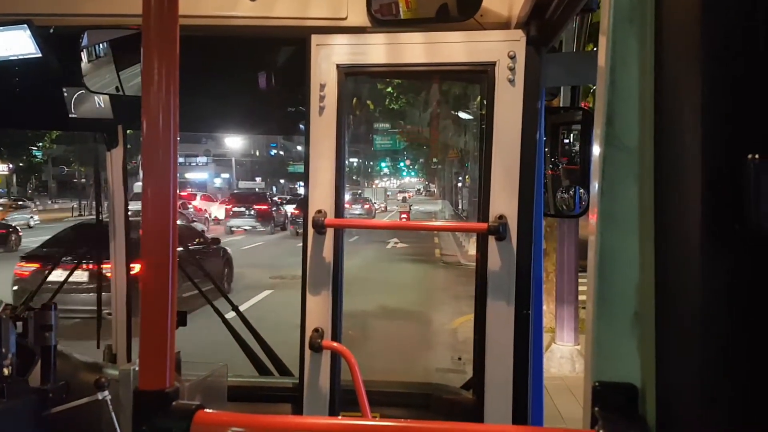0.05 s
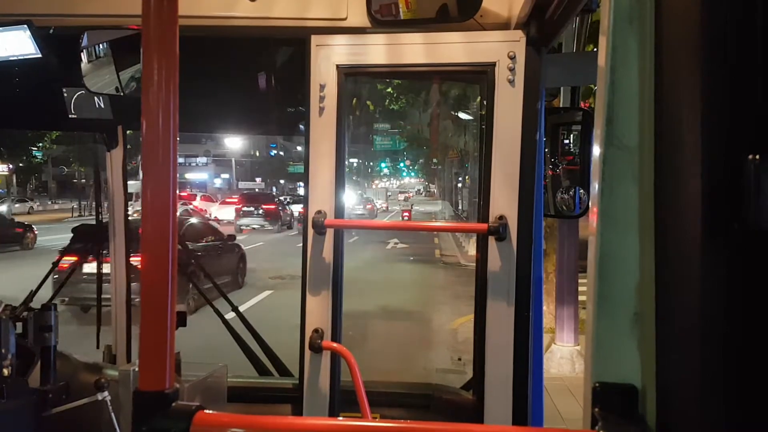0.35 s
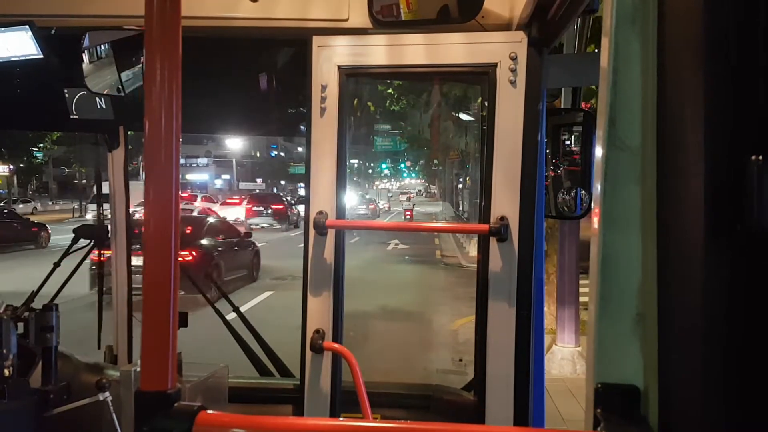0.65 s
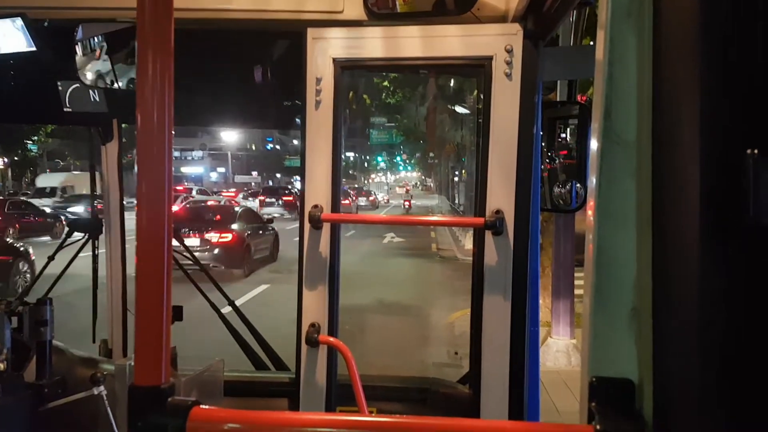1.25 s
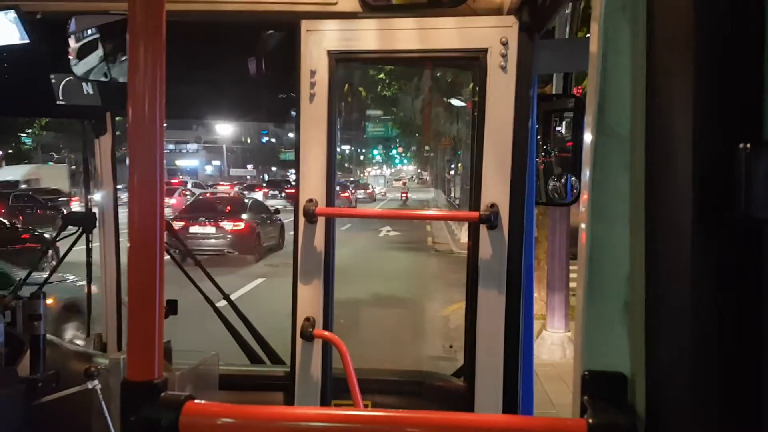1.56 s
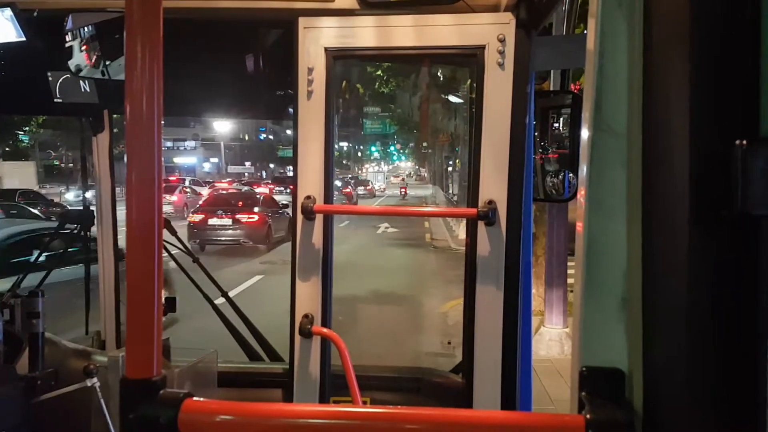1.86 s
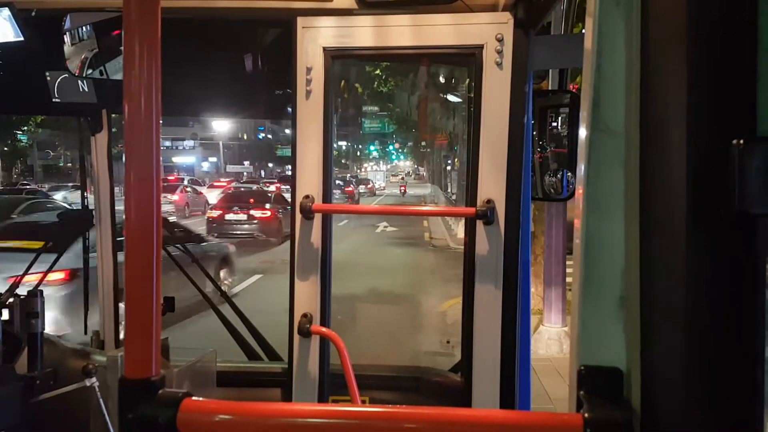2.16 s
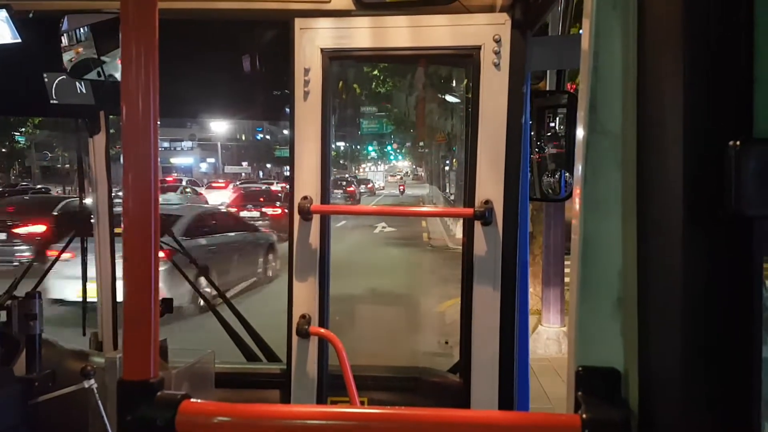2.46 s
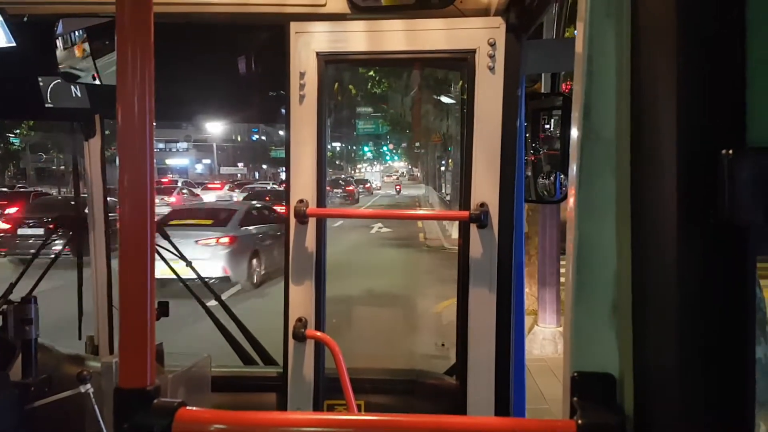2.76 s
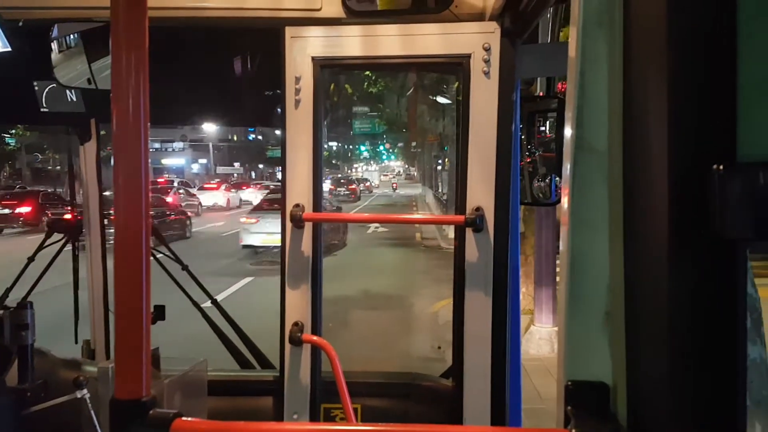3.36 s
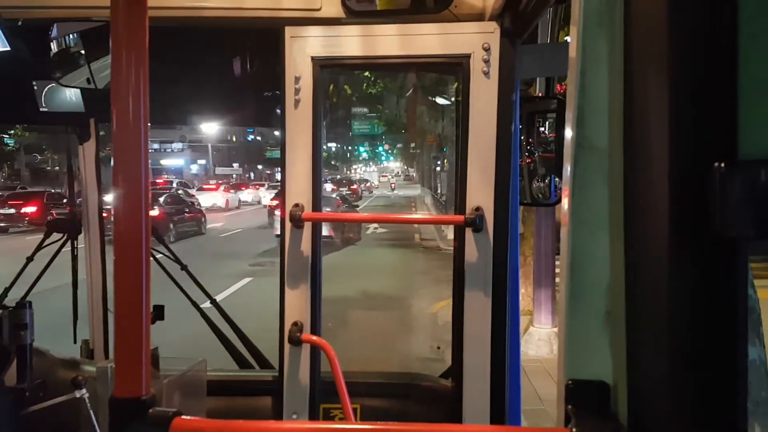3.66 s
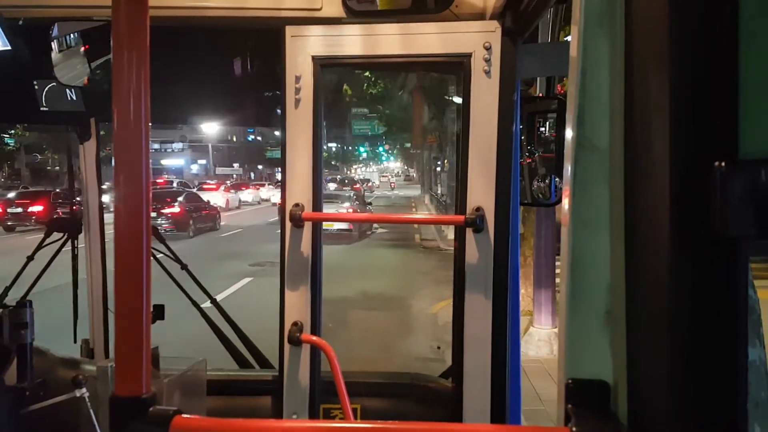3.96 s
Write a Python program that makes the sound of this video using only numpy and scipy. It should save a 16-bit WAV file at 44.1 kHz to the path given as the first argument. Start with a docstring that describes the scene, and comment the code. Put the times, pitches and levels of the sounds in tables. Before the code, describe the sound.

A pneumatic bus door hisses, rumbles along its track and thuds shut.

```python
"""Bus door closing at night

Inside a city bus in traffic, a pneumatic door closes. Air hisses and whistles out of its valve,
the leaf rumbles along its track, shakes the body panels and thuds shut, and small puffs and
squeaks of air follow. Under it all the cabin hums and rumbles, and the engine begins to pull."""
import sys
import numpy as np
from scipy import signal
from scipy.fft import rfft, irfft, next_fast_len
from scipy.io import wavfile
from scipy.ndimage import map_coordinates

SR = 44100
rng = np.random.default_rng(int(sys.argv[2]) if len(sys.argv) > 2 else 0)


def materialize(psi):
    """Save the field psi as 16-bit PCM at rate SR to the path in sys.argv[1].

    A 1-D psi becomes a single channel; in a 2-D psi each row is a channel.
    """
    bounded = np.clip(np.atleast_2d(psi).T, -1, 1)
    quanta = np.round(bounded * 32767).astype(np.int16)
    wavfile.write(sys.argv[1], SR, quanta)


N = 176400

# dull knock of a body panel: freq_hz, level_db
PANEL_COLOUR = [(60, -35), (130, 3), (175, 4), (270, 1), (350, -3), (500, -10.5), (800, -14), (1500, -33),
                (4000, -50)]
# bright rattle of the fittings: freq_hz, level_db
RATTLE_COLOUR = [(250, -16), (480, 4), (950, 6.5), (1400, 4.5), (1900, 1.5), (2600, -12.5), (3600, -12.5),
                 (6000, -17), (14000, -36)]


def amp(db):
    """Decibels to gain."""
    return 10 ** (np.asarray(db) / 20)


def unit(x):
    """Scale to rms 1."""
    return x / np.sqrt(np.mean(np.abs(x) ** 2) + 1e-20)


def along(points, hz):
    """Read (freq_hz, value) points on a log frequency axis."""
    freqs, values = np.transpose(points)
    return np.interp(np.log(hz + 1), np.log(freqs + 1), values)


def clock():
    """Time of each sample in seconds."""
    return np.arange(N) / SR


def curves(rows):
    """One automation curve for each column after the time."""
    times, *columns = np.transpose(rows)
    return [np.interp(clock(), times, column) for column in columns]


def wobble(rate):
    """A smooth random curve, rate knots a second."""
    t = clock()
    coarse = t[::8]
    knots = rng.standard_normal(N // 16)
    return np.interp(t, coarse, map_coordinates(knots, [coarse * rate], mode='wrap'))


def burst(start, rise, t60):
    """A straight rise, then an exponential decay; times in seconds."""
    t = clock() - start
    return np.clip(t / rise, 0, 1) * np.exp(-np.log(1000) * np.maximum(t - rise, 0) / t60)


def gate(start, end, fall_s):
    """An envelope that swells in 40 ms, holds and dies away."""
    t = clock()
    return np.clip((t - start) / .04 + .5, 0, 1) * np.exp(-np.maximum(t - end, 0) / fall_s)


def filtered(x, response):
    """Equalise x with a gain that is a function of frequency."""
    size = next_fast_len(N + 8192)
    return irfft(rfft(x, size) * response(np.fft.rfftfreq(size, 1 / SR)), size)[..., :N]


def rush(colour):
    """Coloured stereo noise of rms 1: centred in the bass, diffuse in the treble."""
    # likeness of left and right in the cabin: freq_hz, correlation
    likeness = [(60, 0.97), (130, 1), (290, 0.94), (450, 0.64), (640, 0.09), (1400, -0.074), (3100, 0.17),
                (15000, -0.22)]

    def mid_side_gains(hz):
        spread = np.arccos(np.clip(along(likeness, hz), -1, .992)) / 2
        return amp(along(colour, hz)) * [np.cos(spread), np.sin(spread)]

    mid, side = filtered(rng.standard_normal((2, N)), mid_side_gains)
    return unit(np.array([mid + side, mid - side]))


def resonance(hz, width_hz):
    """Stereo noise ringing in one resonance, whose centre may move."""
    offset_hz = np.fft.fftfreq(N, 1 / SR)
    drive = rng.standard_normal((2, N)) + 1j * rng.standard_normal((2, N))
    envelope = np.fft.ifft(drive / (1 + 2 * (offset_hz / width_hz) ** 2))
    carrier = np.exp(2j * np.pi * np.cumsum(hz * np.ones(N)) / SR)
    return unit((envelope * carrier).real)


def tones(rows, partials):
    """A gliding tone whose partials (multiple, gain_db) each waver in level."""
    hz, db = curves(rows)
    phase = 2 * np.pi * np.cumsum(hz) / SR
    return np.sqrt(2) * sum(amp(db + gain_db + wobble(10)) * np.sin(k * phase + rng.uniform(0, 2 * np.pi))
                            for k, gain_db in partials)


def walls(x):
    """Early echoes from the cabin walls comb the sound, differently at each ear."""
    count, mean_delay_s, echoes_db = 14, .018, -2
    response = np.zeros((2, SR // 8))
    for ear in response:
        delays = np.minimum(rng.exponential(mean_delay_s * SR, count).astype(int) + 1, len(ear) - 1)
        ear[delays] = amp(echoes_db) * unit(rng.standard_normal(count)) / np.sqrt(count)
        ear[0] = 1
    return signal.fftconvolve(x, response / np.linalg.norm(response[0]), axes=1)[:, :N]


def cabin():
    """The bed: road and traffic rumble under a machine hum."""
    # road and traffic noise: freq_hz, level_db
    road_colour = [(20, -12), (35, -8), (58, -1), (80, -1), (110, -2), (160, -3), (200, -4), (260, -8),
                   (380, -12), (540, -17), (700, -14), (950, -11), (1250, -22), (2000, -22), (2900, -31),
                   (4500, -39), (7500, -50), (11000, -49), (15500, -60)]
    # machine hum: time_s, pitch_hz, level_db
    hum = [(0, 117.7, -35.5), (.45, 117.8, -38.5), (1.2, 117.7, -33), (2.2, 119.3, -35),
           (2.8, 120.3, -32.5), (3.25, 120.4, -28.5), (4, 120.6, -30)]
    road = amp(-31.5 + 0.42 * wobble(19)) * rush(road_colour)
    # partials of the hum: multiple, gain_db
    hum_partials = [(.5, -18), (1, 0), (3, -22)]
    return road + tones(hum, hum_partials)


def engine():
    """A faint whine rises with the revs; later the low orders swell as the bus pulls away."""
    # engine pulling: time_s, firing_hz, level_db
    pull = [(2.7, 46, -60), (3.15, 48, -69), (3.6, 51, -39.5), (4, 53.5, -33)]
    # whine, sounding just below its base: time_s, base_hz, level_db
    whine = [(0, 192.4, -58), (.3, 210, -54), (.6, 236, -45.5), (.75, 246.6, -55)]
    return tones(pull, partials=[(2, 0), (3, 0)]) + tones(whine, partials=[(0.92, 0)])


def groan():
    """The door seal groans briefly as the bus moves off."""
    # tone of the seal: time_s, pitch_hz, level_db
    glide = [(3.955, 390, -62), (3.972, 393, -33.5), (4, 396, -33.5)]
    return tones(glide, partials=[(1, 0)])


def scuffs():
    """The rubber seal brushes against the door frame."""
    # strokes of the seal: start_s, rise_s, level_db
    strokes = [(2.335, 0.029, -38), (3.84, .04, -49.5), (3.912, 0.031, -42)]
    # rubber friction: freq_hz, level_db
    colour = [(800, -15), (2000, 4.5), (3000, 3.5), (5000, -5.5), (8000, -17), (15000, -18)]
    return rush(colour) * sum(amp(db) * burst(start, rise, t60=0.52) for start, rise, db in strokes)


def squeaks():
    """The last air leaks past a seal in thin tones, roughened by turbulence."""
    # leaks: start_s, end_s, pitch_hz, level_db
    leaks = [(2.5, 2.58, 11225, -58.5), (2.975, 3.26, 11218, -65), (3.3, 3.38, 11620, -74.5)]
    sound = 0
    for start, end, hz, db in leaks:
        tone = np.sqrt(2) * np.sin(2 * np.pi * hz * clock())
        turbulence = amp(-2) * resonance(hz, width_hz=110)
        sound += amp(db) * gate(start, end, fall_s=.025) * unit(tone + turbulence)
    return sound


def puffs():
    """Short releases of air ring the exhaust pipe after the door has shut."""
    # releases of air: start_s, rise_s, level_db
    releases = [(2.668, .012, -54), (2.748, .005, -49), (3.34, .015, -55), (3.692, 0.012, -42.5),
                (3.715, 0.034, -35)]
    # breath of a puff: freq_hz, level_db
    colour = [(450, 4), (800, 16.5), (1300, 7), (2500, 6.5), (4500, -1), (7500, -8), (10000, -3),
              (12500, -1), (15500, -8)]
    # pipe resonances, set against the breath: pitch_hz, width_hz, gain_db
    pipe_modes = [(716, 30, -7), (861, 16, -3.5), (11750, 250, -19)]
    pipe = sum(amp(db) * resonance(hz, width)[0] for hz, width, db in pipe_modes)
    envelope = sum(amp(db) * burst(start, rise, t60=.33) for start, rise, db in releases)
    return (rush(colour) + pipe) * envelope


def heave():
    """Jolts of the moving leaf ring single low modes of the bus body."""
    # jolted modes: start_s, pitch_hz, level_db, rise_s, t60_s
    jolts = [(.683, 234, -24, .014, .42), (.735, 166, -27, .015, .22), (.735, 90, -21.5, .04, .3),
             (1.008, 272, -26, .014, .22), (1.116, 345, -27, .01, .3), (1.295, 266, -21, .02, .25),
             (1.325, 195, -25, .012, .2)]
    return sum(amp(db) * burst(start, rise, t60) * np.sin(2 * np.pi * hz * (clock() - start))
               for start, hz, db, rise, t60 in jolts)


def bumps():
    """Each bump of the leaf rattles the fittings, rings the panel and then booms in the cabin."""
    # bumps of the leaf: start_s, boom_db, panel_db, rattle_db
    hits = [(0.685, -30, -30.5, -39.5), (1.006, -42, -25.5, -45), (1.118, -32, -25.5, -46),
            (1.155, -38, -30.5, -47), (1.288, -29.5, -30, -42), (1.385, -32, -27.5, -43),
            (1.584, -50, -24, -37), (1.679, -46, -24.5, -52), (3.966, -42, -26, -49)]
    # cabin boom: freq_hz, level_db
    boom_colour = [(20, -1.5), (30, 4), (55, 4.5), (90, 5.5), (130, 3.5), (190, -6), (300, -49), (800, -66)]
    boom = sum(amp(db) * burst(start, rise=0.026, t60=0.4) for start, db, _, _ in hits)
    panel = sum(amp(db) * burst(start, rise=0.008, t60=0.37) for start, _, db, _ in hits)
    rattle = sum(amp(db) * burst(start, rise=0.0034, t60=0.61) for start, _, _, db in hits)
    return boom * rush(boom_colour) + panel * rush(PANEL_COLOUR) + rattle * rush(RATTLE_COLOUR)


def rolling():
    """The leaf judders along its track on grinding rollers and shakes the body panels."""
    # swell of the rumble: time_s, level_db
    roll_swell = [(.95, -79), (1.22, -45), (1.32, -27), (1.42, -27), (1.46, -31), (1.52, -23.5),
                  (1.7, -29.5), (1.88, -25.5), (2.05, -34.5), (2.25, -53), (2.3, -65)]
    # low rumble of the track: freq_hz, level_db
    roll_colour = [(25, -7), (60, 7.5), (110, 0), (165, 5), (270, 2.5), (340, -8), (500, -25), (900, -22),
                   (2500, -30.5)]
    # swell of the grinding: time_s, level_db
    grind_swell = [(1.2, -64), (1.4, -33.5), (1.53, -31.5), (1.61, -25.5), (1.66, -32.5), (1.71, -29.5),
                   (1.77, -31.5), (1.9, -32.5), (2, -40), (2.25, -52.5)]
    # brighter grinding of the rollers: freq_hz, level_db
    grind_colour = [(200, -33), (330, -1), (420, 3.5), (560, -6.5), (820, -6.5), (1100, -23.5), (1700, -18),
                    (3000, -32.5), (8000, -51)]
    # panel resonances: pitch_hz, width_hz, gain_db
    panel_modes = [(134.6, 8.2, -2), (169.8, 12, -0.5), (199.4, 7.5, -3), (261, 15, 1.5), (336, 14, -3.5),
                   (361.6, 20, -6.5), (495, 20, -11), (561, 13, -6.5)]
    roll_db, = curves(roll_swell)
    grind_db, = curves(grind_swell)
    judder_db = wobble(55)
    track = rush(roll_colour)
    panels = unit(sum(amp(db) * resonance(hz, width)[0] for hz, width, db in panel_modes))
    rumble = amp(roll_db + judder_db) * unit(track + amp(-1.5) * panels)
    grind = amp(grind_db + 0.91 * judder_db) * walls(rush(grind_colour))
    return rumble + grind


def slam():
    """The leaf meets its frame with a clack, and the whole bus body booms."""
    # modes of the body: pitch_hz, level_db, rise_s, t60_s
    body_modes = [(27, -31, 0.22, .9), (42, -25, 0.028, 0.86), (55.3, -22.5, 0.21, 0.63),
                  (72.7, -26, .025, 0.59), (86.4, -17, 0.024, 0.33), (102, -22.5, .03, 0.7),
                  (142.3, -22.5, 0.068, 0.99), (168.5, -23, 0.073, 0.5), (264, -24, 0.049, 0.57),
                  (282, -28, 0.055, 0.27), (325.4, -33, 0.012, 0.44)]
    start_s = 2.303
    t = clock() - start_s
    ring = 0
    for hz, db, rise, t60 in body_modes:
        phase = 2 * np.pi * hz * t + rng.uniform(0, 2 * np.pi) + 0.36 * wobble(25)
        ring += amp(db) * burst(start_s, rise, t60) * np.sin(phase)
    thud = amp(-23.5) * burst(start_s, rise=0.018, t60=1.0) * rush(PANEL_COLOUR)
    clack = amp(-29) * burst(start_s, rise=0.0011, t60=0.48) * rush(RATTLE_COLOUR)
    return ring + thud + clack


def rebound():
    """A second, softer thud as the leaf settles into its seal."""
    # modes of the thud: pitch_hz, gain_db, t60_s
    modes = [(108, -2, .2), (158, 0, .2), (268, -8, .3)]
    start_s, rise_s, level_db = 2.445, .014, -22
    thud = 0
    for hz, gain_db, t60 in modes:
        phase = 2 * np.pi * hz * clock() + rng.uniform(0, 2 * np.pi)
        thud += amp(level_db + gain_db) * burst(start_s, rise_s, t60) * np.sin(phase)
    return thud


def vent():
    """Turbulence makes each narrow resonance of the vent flutter in level and wander in pitch."""
    # vent resonances: start_s, end_s, pitch_hz, width_hz, level_db
    modes = [(0.415, 1.02, 8200, 230, -47), (1.03, 1.55, 8240, 230, -45.5), (.8, 1.52, 11900, 450, -48),
             (0.907, 1.55, 6050, 280, -59), (1.55, 2.17, 10390, 330, -43), (1.75, 2.17, 8050, 280, -50),
             (1.584, 2.2, 11300, 420, -59), (1.54, 2.153, 6500, 380, -52), (2.134, 2.385, 6470, 330, -50.5),
             (2.17, 2.33, 9900, 600, -49), (2.18, 2.37, 8100, 300, -59)]
    sound = 0
    for start, end, hz, width, db in modes:
        flutter_db = 1.4 * wobble(90)
        wander_hz = 20 * wobble(45)
        sound += amp(db + flutter_db) * gate(start, end, fall_s=0.055) * resonance(hz + wander_hz, width)
    return walls(sound)


def valve():
    """A spitting jet that dulls as the flow is throttled, and a whistle that sinks with the pressure."""
    # fade of the jet: time_s, level_db
    jet_fade = [(0, -30.5), (.3, -32), (.7, -32.5), (1.05, -34), (1.52, -34), (1.58, -43.5), (1.9, -38.5),
                (2.15, -39.5), (2.33, -44.5), (2.45, -54), (2.6, -68), (2.75, -100)]
    # hiss of the open valve: freq_hz, level_db
    open_colour = [(900, -23.5), (1800, -3), (2800, -5), (4200, -2.5), (5200, -5.5), (6300, -2),
                   (7500, -7.5), (8300, -0.5), (9300, -0.5), (10300, 2.5), (11900, 1.5), (13200, -2.5),
                   (14900, -2.5), (15800, -16)]
    # duller hiss of the throttled valve: freq_hz, level_db
    throttled_colour = [(900, -18), (1800, -3), (2800, -1.5), (3900, 1), (5200, -6.5), (6300, -3),
                        (7400, -5), (8300, 1), (8800, -0.5), (9800, 3.5), (10700, 2.5), (11700, 2.5),
                        (12900, -6), (14900, -8), (15800, -11)]
    # main whistle: time_s, pitch_hz, level_db
    whistle_glide = [(0, 10880, -28.5), (.12, 10550, -29.5), (.3, 10480, -35.5), (.7, 9890, -43.5),
                     (1.05, 10460, -56), (1.5, 10400, -62), (1.6, 10400, -96)]
    throttle_s, crossfade_s = 1.55, .05
    jet_db, = curves(jet_fade)
    whistle_hz, whistle_db = curves(whistle_glide)
    spit_db = 1.5 * wobble(500)
    throttled = np.clip((clock() - throttle_s) / crossfade_s + .5, 0, 1)
    hiss = np.sqrt(1 - throttled) * rush(open_colour) + np.sqrt(throttled) * rush(throttled_colour)
    jet = amp(jet_db) * unit(amp(spit_db) * walls(hiss))
    whistle = amp(whistle_db) * unit(walls(resonance(whistle_hz, width_hz=620)))
    return jet + whistle


def scene():
    """Air, bus and door together; the highest hiss leans left, the band below it right."""
    # lean of the escaping air: freq_hz, left_over_right_db
    lean = [(1500, 1.5), (4200, -2.5), (6000, -.5), (8000, 1), (9600, 3.5), (11000, .5), (15000, 1)]
    air = valve() + vent() + puffs() + squeaks()
    air = filtered(air, lambda hz: amp(along(lean, hz) * np.array([[.5], [-.5]])))
    bus = cabin() + engine()
    door = rolling() + heave() + bumps() + slam() + rebound() + scuffs() + groan()
    return air + bus + door


def record(dry):
    """A brick-wall low-pass takes off the very top."""
    cutoff_hz = 15750
    return filtered(dry, lambda hz: hz < cutoff_hz)


dry = scene()
out = record(dry)
materialize(out)
```